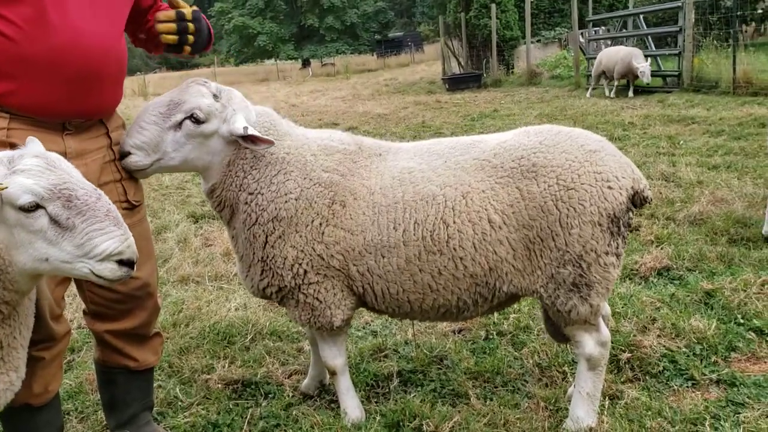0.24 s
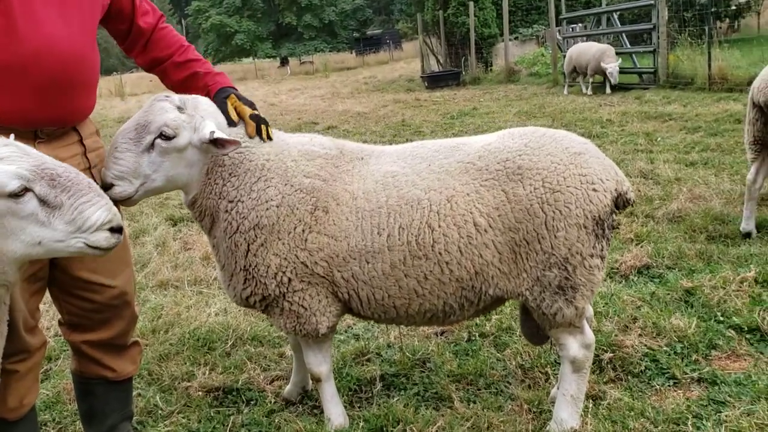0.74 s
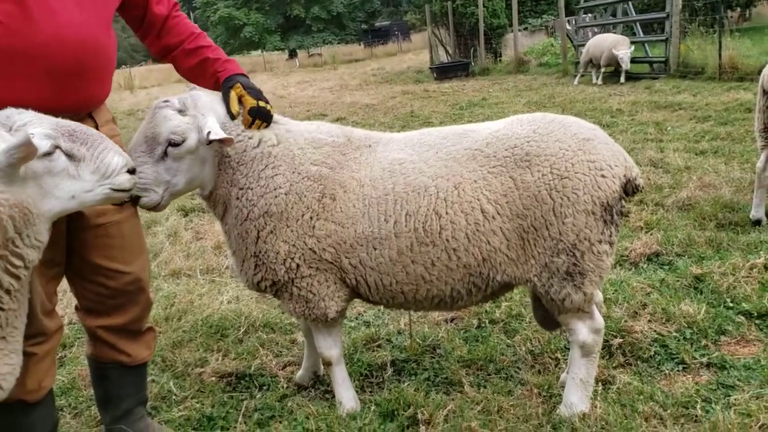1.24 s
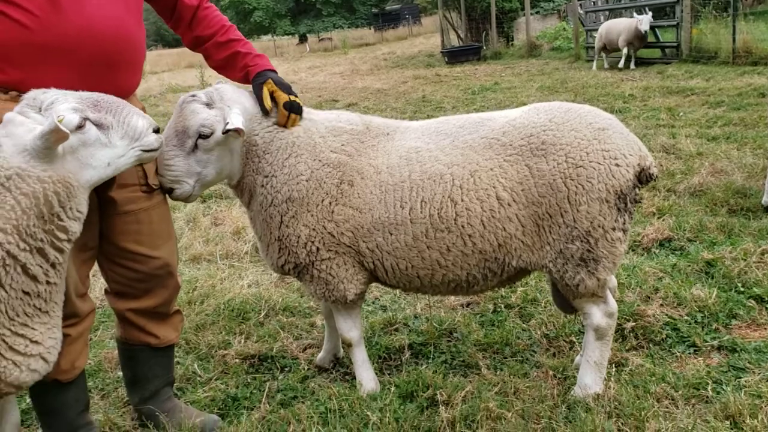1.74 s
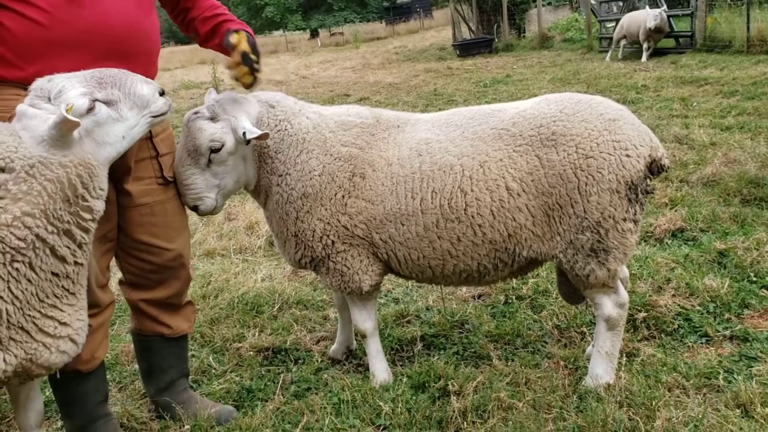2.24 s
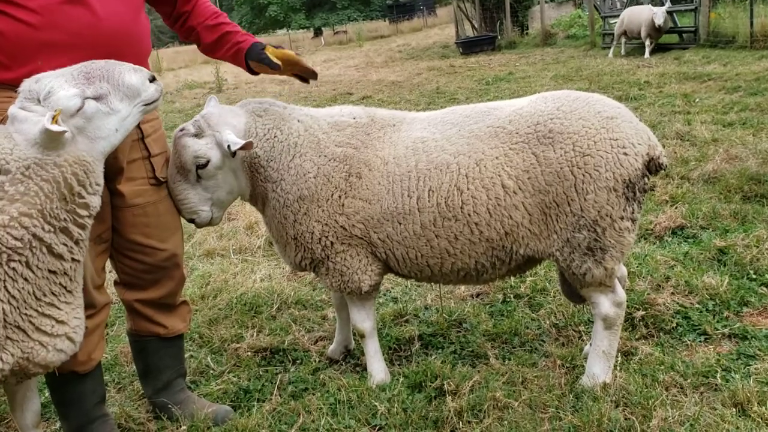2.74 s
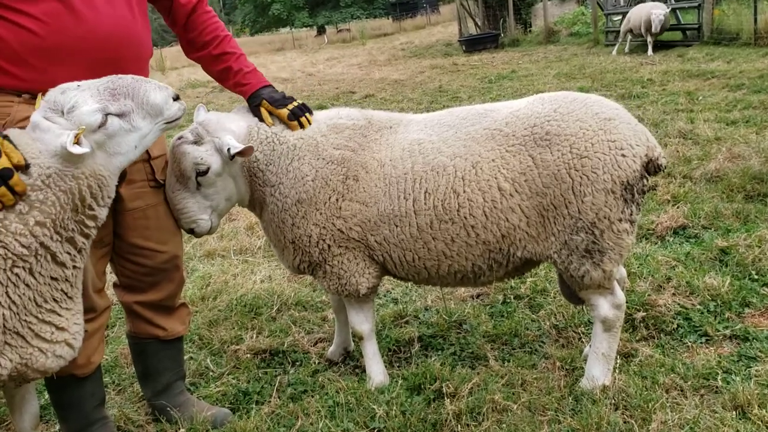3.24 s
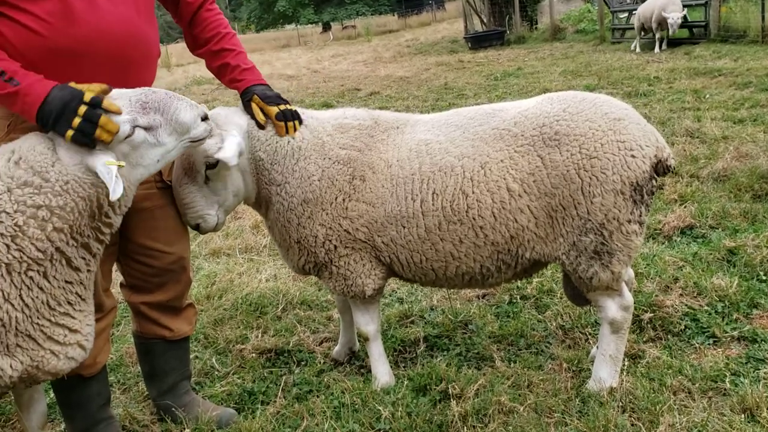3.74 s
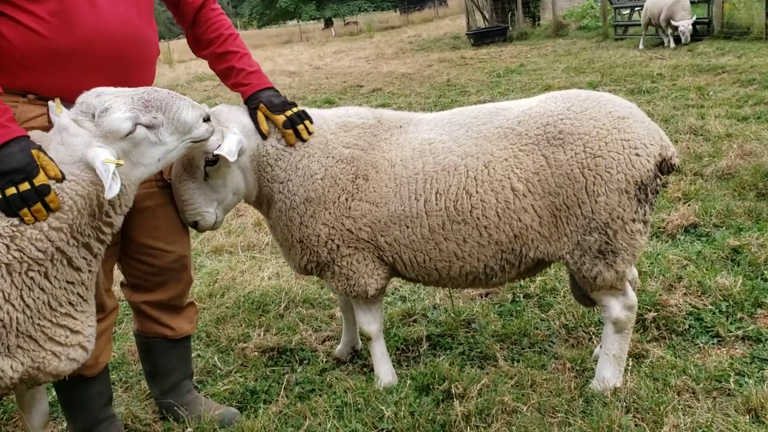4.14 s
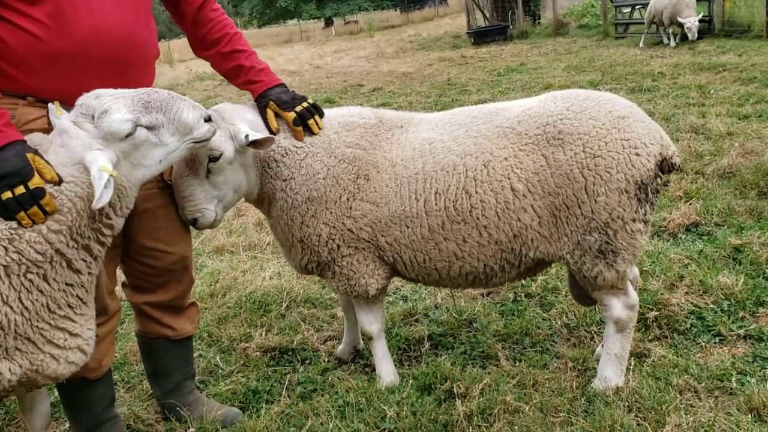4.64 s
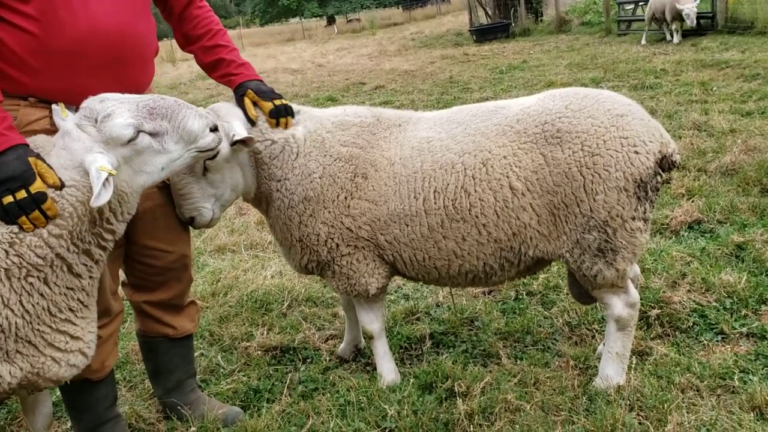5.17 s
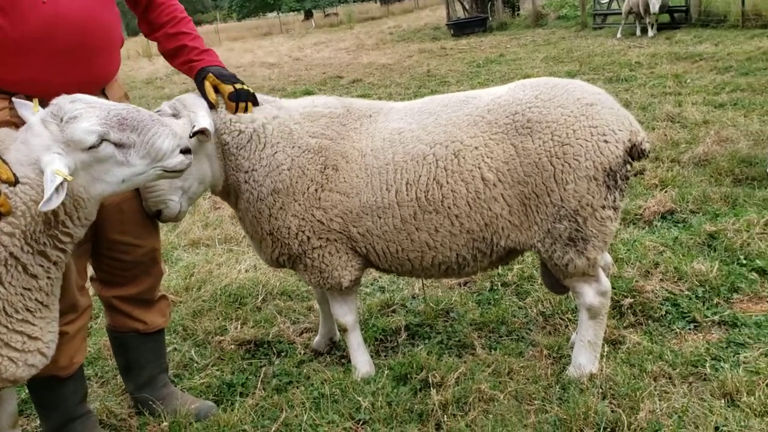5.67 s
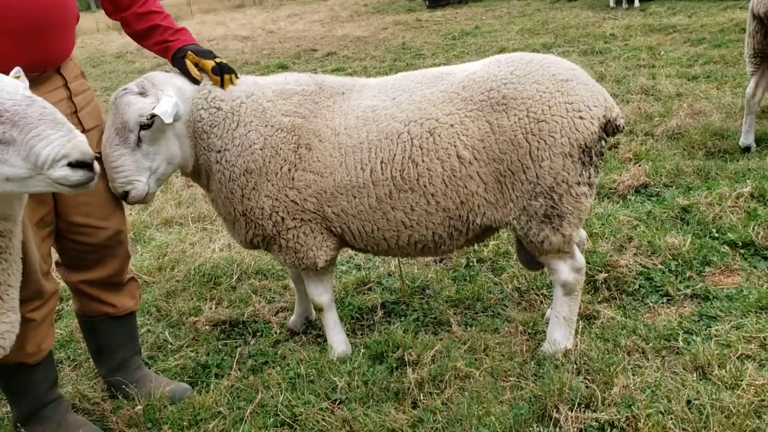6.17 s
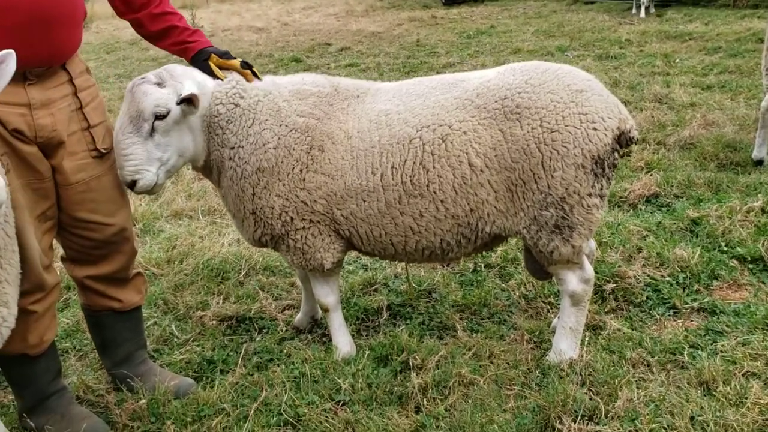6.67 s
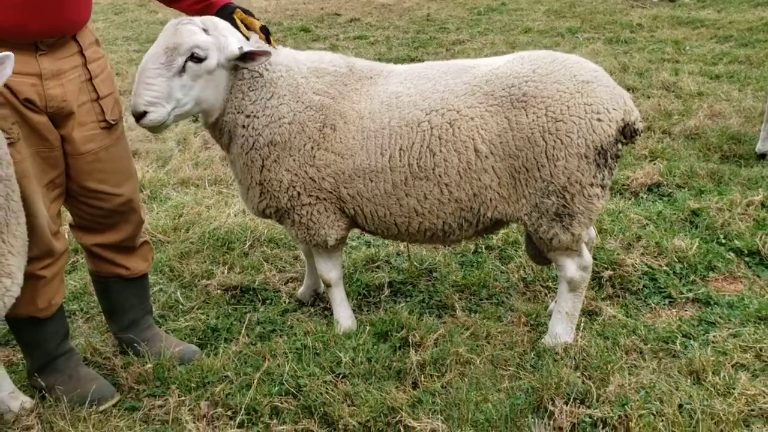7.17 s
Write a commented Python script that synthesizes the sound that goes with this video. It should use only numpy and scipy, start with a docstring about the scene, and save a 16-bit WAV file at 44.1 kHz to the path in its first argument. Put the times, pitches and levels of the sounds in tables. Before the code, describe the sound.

A quiet grassy pasture with faint distant traffic rumble and barely audible machine hum, heard on a stereo phone. A loose sheet-metal hurdle a few metres away, slightly to the left, is knocked by sheep. A loud clattering clank comes at 0.15 seconds, with weaker taps to 0.8. Another cluster rattles from 1.3 to 1.5, with a soft hiss swell. After a lull, several clanks fall between 2.3 and 2.55, then one at 3.0 with dull hoof thuds. Lighter ticks follow, with knocks near 3.9 and 4.7, and a thud at 4.95. A hard, rattling double clank hits at 5.5 to 5.6 with a thud, trailing to 5.9. Small taps continue around 6.5. Bright hiss surges at 6.8, a heavy low thud with a dry knock lands at 7.0, and the strongest clank strikes at 7.4. Each ring is short, noisy and tonal, with a brief scattered outdoor echo.

```python
"""A pasture where sheep jostle and keep knocking a loose sheet-metal hurdle a few metres off.
The hurdle clanks: each blow is a crack, a ring of shaped noise and a set of fading tones, with a short echo
from fences and sheds. Filtered noise makes a soft low murmur and a crisper rattle that swell around the louder
blows, the far traffic rumble and a bright hiss, strongest near the end; hooves thud as damped tones, and faint
machine tones hum. A phone with two microphone ports listens."""
import sys
import numpy as np
from scipy import signal
from scipy.fft import rfft, irfft, next_fast_len
from scipy.io import wavfile
from scipy.ndimage import uniform_filter1d

SR = 44100
rng = np.random.default_rng(int(sys.argv[2]) if len(sys.argv) > 2 else 0)


def store_wav(level_fs):
    """Save 16-bit WAV to argv[1]."""
    pcm = np.round(np.clip(np.atleast_2d(level_fs), -1, 1) * 32767)
    wavfile.write(sys.argv[1], SR, pcm.T.astype(np.int16))


N = 326781
FAST = next_fast_len(N)  # samples, a length that transforms quickly
TOP_HZ = 15850  # top of the noise and of the recorded sound

# edges of the parts, low to high, that the hurdle's ring is split into: f/Hz
PART_EDGES = [300, 2000, 3200, 4500, 6500, 8500, 16500]


def undb(db):
    """Turn decibels into a plain gain."""
    return 10 ** (np.asarray(db) / 20)


def pan(db):
    """Gains of the left and right ports; db is left minus right."""
    return undb(np.array([[1], [-1]]) * db / 2)


def fade(t, t60):
    """Exponential decay that falls by 60 dB in t60 seconds."""
    return np.exp(-np.log(1000) * t / t60)


def over_hz(table, column=1, size=N):
    """A table column read at every frequency of a spectrum, joined by straight lines over log frequency."""
    rows = np.array(table, float)
    hz = np.maximum(np.fft.rfftfreq(size, 1 / SR), 1)
    return np.interp(np.log(hz), np.log(rows[:, 0]), rows[:, column])


def pair(tone, column, size=N):
    """Two-port noise spectrum of a given colour, rms 1; the ports share a part of it."""
    # how alike the two ports hear a sound: f/Hz, near source/0-1, spread source/0-1
    likeness = [(30.2, .9, 0.92), (103, 0.5, .92), (500, 1, 0.73), (970, 1, 0.43), (1880, 1, 0.25),
                (3280, 0.39, 0.43), (4250, 0.16, 0), (6450, 0, 0.07), (15600, 0, 0)]
    alike = np.clip(over_hz(likeness, column, size), 0, 1)
    mid, side = rfft(rng.standard_normal((2, size)))
    gain = undb(over_hz(tone, size=size)) * (np.fft.rfftfreq(size, 1 / SR) < TOP_HZ)
    both = np.sqrt(1 + alike) * mid + np.sqrt(1 - alike) * side * np.array([[1], [-1]])
    return both * gain / np.sqrt(2 * np.mean(gain ** 2))


def walk(rate):
    """Random levels held for 1 / rate seconds and smoothed twice; spread near 1."""
    hold = int(SR / rate)
    steps = np.repeat(rng.standard_normal(N // hold + 1), hold)
    return 0.74 * uniform_filter1d(uniform_filter1d(steps, hold), hold)[:N]


def octaves(spectrum, flicker_db, rate):
    """Turn a spectrum into sound in overlapping octaves, each flickering on its own."""
    place = np.log2(np.maximum(np.fft.rfftfreq(FAST, 1 / SR), 20) / 20)  # octaves above 20 Hz
    total = 0
    for k in range(4, 11):
        share = np.clip(1 - abs(place - k), 0, 1)
        part = irfft(spectrum * share, FAST)[:, :N]
        total = total + part * undb(flicker_db * walk(rate))
    return total


def distance():
    """Far traffic is low noise whose level drifts slightly; far machinery is a few weak wavering tones."""
    # colour of the traffic: f/Hz, level per Hz/dB
    rumble_tone = [(13, -33), (22, -28), (41, -16), (71, -2.5), (90, -3.5), (125, -10), (151, -13.5),
                   (200, -20.5), (226, -16.5), (248, -25.5), (277, -26), (650, -40), (900, -34),
                   (1170, -73), (1980, -120)]
    # tones of the machinery: f/Hz, middle level/dB
    machine_tones = [(147, -76), (181, -78.5), (226, -91)]
    t = np.arange(N) / SR
    hum = 0
    for hz, db in machine_tones:
        level = np.sqrt(2) * undb(db + 2 * walk(1.8))
        hum = hum + level * np.sin(2 * np.pi * hz * t)
    rumble = irfft(pair(rumble_tone, column=2, size=FAST), FAST)[:, :N]
    return hum + rumble * undb(-59.5 + 0.5 * walk(3.975))


def hiss():
    """Bell-shaped swells of bright noise over a faint steady one."""
    # swells: peak t/s, level/dB, rise/s, fall/s
    swells = [(0.0, -72.5, .1, .2), (0.45, -73, .1, 0.092), (1.15, -76, .25, .1),
              (1.42, -63.5, 0.12, 0.092), (1.9, -75.5, 0.072, .2), (3.14, -65.5, 0.061, 0.052),
              (3.82, -70.5, 0.13, 0.14), (4.3, -77.5, 0.17, .2), (4.93, -66.5, .06, 0.046),
              (5.32, -74, 0.052, 0.28), (5.81, -69, .08, 0.071), (6.38, -65, 0.082, 0.12),
              (6.8, -49, .17, 0.11), (7.0, -53.5, 0.12, 0.086), (7.4, -56, 0.12, .1)]
    # colour: f/Hz, level per Hz/dB
    hiss_tone = [(500, -7), (1000, -7.5), (2500, -7.5), (4500, -4.5), (8000, 2.5), (10000, -1), (12000, 5),
                 (16000, 4)]
    floor_db, pan_db = -81, -2
    t = np.arange(N) / SR
    power = undb(2 * floor_db)
    for s, db, rise, fall in swells:
        width = np.where(t < s, rise, fall)
        power = power + undb(2 * db) * np.exp(-((t - s) / width) ** 2)
    sound = octaves(pair(hiss_tone, column=2, size=FAST), flicker_db=0.3, rate=31)
    return sound * np.sqrt(power) * pan(pan_db)


def murmur_and_rattle():
    """Flickering noise split into a soft low murmur and a crisper rattle, swelling around the louder blows."""
    # how loud the two parts are: t/s, murmur level/dB, rattle level/dB
    part_levels = [(0.0, -64, -64), (0.18, -70, -66.5), (0.33, -72, -60.5), (0.56, -72, -69),
                   (0.97, -86, -76), (1.23, -86.5, -79), (1.44, -72, -67), (1.95, -69, -67.5),
                   (2.16, -73, -73), (2.39, -84, -89), (2.51, -61, -63), (2.82, -79.5, -74.5),
                   (3.27, -71, -71.5), (3.68, -80.5, -76), (3.93, -73, -68), (4.63, -82.5, -76.5),
                   (4.82, -70, -69), (4.96, -75.5, -69.5), (5.23, -85, -81.5), (5.47, -73, -78),
                   (5.6, -65, -50), (5.7, -57, -56), (5.86, -73, -72.5), (6.09, -74, -74.5),
                   (6.36, -75, -75.5), (6.73, -69.5, -67), (7.16, -63.5, -67.5), (7.39, -62.5, -61.5)]
    # colour: f/Hz, level per Hz/dB
    noise_tone = [(500, -7.5), (800, -5), (1150, 7), (1500, 1.5), (2100, -7), (3200, -3), (5000, -6),
                  (7500, -6), (9500, -17), (16000, -17)]
    split_hz = 2170
    tone = pair(noise_tone, column=2, size=FAST)
    hz = np.maximum(np.fft.rfftfreq(FAST, 1 / SR), 1)
    crisp = 1 / (1 + (split_hz / hz) ** 6)
    s, *levels_db = np.transpose(part_levels)
    total = 0
    for share, db in zip((1 - crisp, crisp), levels_db):
        part = octaves(tone * share, flicker_db=4.0, rate=16)
        total = total + part / part.std() * undb(np.interp(np.arange(N) / SR, s, db))
    return total


def thuds():
    """Hooves and bodies on turf: a dull damped swing of the ground, pushed softly, with a dry knock on top."""
    # thuds: t/s, level/dB, pitch f/Hz, time to fall 60 dB/s, knock level against the swing/dB
    thud_list = [(0.496, -65, 195, 0.042, -12), (1.095, -50, 335, 0.033, -10),
                 (3.059, -58.5, 323, 0.086, -6), (3.151, -61, 313, 0.095, -12),
                 (4.947, -49, 280, 0.065, -12), (5.5, -43, 342, 0.041, -11), (5.903, -47, 266, 0.034, -12),
                 (6.978, -39.5, 356, 0.026, 8), (6.983, -35, 110, 0.055, -11),
                 (6.993, -45.5, 273, 0.027, 6)]
    size = SR // 5
    t = np.arange(size) / SR
    knock_filter = signal.butter(2, [400, 2200], "band", fs=SR, output="sos")
    out = np.zeros(N + size)
    for s, level_db, hz, t60, knock_db in thud_list:
        soft_start = 1 - np.exp(-t / 0.0039)
        swing = np.sin(2 * np.pi * hz * t) * fade(t, t60) * soft_start
        knock = signal.sosfilt(knock_filter, rng.standard_normal(size)) * np.exp(-t / 0.0022)
        at = int(s * SR)
        out[at:at + size] += undb(level_db) * (swing + undb(knock_db) * knock)
    return out[:N]


def yard(struck):
    """Scattered echoes from fences and sheds: a fading noise tail that builds up over the first moments."""
    # colour of the echo: f/Hz, level per Hz/dB
    echo_tone = [(500, -14), (1100, 8.5), (1600, 2.5), (3000, 5), (3700, -3), (5000, 9), (7000, -11),
                 (9000, -3.5), (16000, -3)]
    echo_db, echo_t60_s, build_up_s = -16, 0.94, 0.0022
    size = SR
    t = np.arange(size) / SR
    noise = irfft(pair(echo_tone, column=2, size=size), size)
    tail = noise * fade(t, echo_t60_s) * (1 - np.exp(-t / build_up_s))
    tail = tail / np.sqrt(np.sum(tail ** 2) / 2)
    # the left port's sound feeds both echoes
    return undb(echo_db) * signal.fftconvolve(struck[:1], tail, axes=1)[:, :N]


def sheet_ring(t, part_db, t60, crack, treble_fade=0.96, chatter_db=2.0, spot_db=4.0):
    """The crowd of sheet modes too close to tell apart: noise in parts, each cracking and then ringing."""
    # colour of the crowd: f/Hz, level per Hz/dB
    sheet_tone = [(300, -25), (800, -17.5), (1150, -1.5), (1600, -1), (1900, -6), (2600, -10.5),
                  (3200, -2.5), (3730, 7), (4150, -5.5), (5200, -5.5), (5800, 3.5), (6300, -6), (7500, -5),
                  (9800, -17.5), (12300, -8.5), (16500, -24)]
    size = len(t)
    hz = np.fft.rfftfreq(size, 1 / SR)
    # loose joints chatter, so each part of the ring comes in lumps of a few milliseconds
    steps = np.repeat(rng.standard_normal((len(part_db), size // 128)), 128, axis=1)
    lumps = uniform_filter1d(steps, size=96)
    # each striking spot favours other groups of modes
    spot_steps = np.repeat(rng.standard_normal(len(hz) // 64 + 1), 64)
    spot = uniform_filter1d(spot_steps, size=48)[:len(hz)]
    sheet = pair(sheet_tone, column=1, size=size) * undb(spot_db * spot)
    total = 0
    for k, db in enumerate(part_db):
        part = irfft(sheet * (hz > PART_EDGES[k]) * (hz <= PART_EDGES[k + 1]), size)
        ring = fade(t, t60 * treble_fade ** k)  # the treble dies sooner
        total = total + undb(db) * part / part.std() * (ring * undb(chatter_db * lumps[k]) + crack)
    return total


def bar_ring(t, part_db, bars_db=-12, scatter_db=3):
    """The clear modes: fading tones whose levels and pitches shift a little, each starting at a random phase."""
    # clear modes: f/Hz, level/dB, time to fall 60 dB/s
    bar_modes = [(371, -18.5, 0.26), (637.6, -10.5, 0.16), (774, -11.5, 0.48), (832, -4.5, 0.34),
                 (1096, 2, 0.37), (1155, -13.5, 0.31), (1324, 2, 0.34), (1440, 3, 0.25), (1556, 6.5, 0.2),
                 (1770, -23, 0.11), (2040, -33, .12), (2189, -0.5, 0.095), (2940, -20, .08),
                 (3230, 7, 0.12), (3460, 10, 0.077), (4030, -15, .1), (5400, -24, .08), (5500, -4, 0.076),
                 (7700, 3, .04), (12400, -8, .04)]
    bar_hz, bar_db, bar_t60 = np.transpose(bar_modes)
    bar_part = np.clip(np.searchsorted(PART_EDGES, bar_hz) - 1, 0, len(PART_EDGES) - 2)
    level_luck, pitch_luck, phase_luck = rng.standard_normal((3, len(bar_hz)))
    gain = undb(bars_db + bar_db + np.array(part_db)[bar_part] + scatter_db * level_luck)
    pitch = bar_hz * (1 + 0.01 * pitch_luck)
    tones = np.sin(2 * np.pi * pitch[:, None] * t + 3 * phase_luck[:, None])
    return gain @ (fade(t, bar_t60[:, None]) * tones)


def hurdle():
    """Each blow cracks and rings the dense and the clear modes in its own mix; returns both layers."""
    # blows: t/s, ring level/dB, brightness per part/dB, extra for the lowest part/dB,
    # time for the lowest part of the dense ring to fall 60 dB/s, crack level against the ring/dB, rise/ms
    blow_list = [(0.1409, -30.5, 0.5, -2, 0.2, -20, 5.2), (0.1503, -35, 1, 3, 0.28, -20, .6),
                 (0.1723, -25, -2.5, -5.5, 0.17, -6, 1.9), (0.2497, -48.5, 1, 10.5, 0.28, -20, 0.5),
                 (0.412, -52.5, -1, -4, 0.43, -23, 3.1), (0.8097, -49.5, -2.5, -9, 0.18, -22, 2.5),
                 (0.8284, -63.5, -3.5, 4, 0.41, -10, 0.48), (1.1345, -65, 0.5, -15, 0.24, -7, 2.2),
                 (1.1859, -60, -1, -4, 0.65, -18, 5.3), (1.265, -60, 5, 6, 0.25, -18, 10),
                 (1.2862, -52.5, 1.5, 4.5, 0.28, -18, 1), (1.3077, -49.5, -2.5, -9, 0.36, -18, 3.1),
                 (1.3368, -34.5, .5, -3, 0.2, -20, 3.1), (1.3793, -29.5, -.5, -2, 0.23, -18, 8.2),
                 (1.4206, -32, -1, -3.5, 0.12, -13, 3.8), (1.4755, -42, -1.5, -2.5, 0.2, -12, 1.7),
                 (1.5238, -58, 4, -5, 0.19, -28, 0.82), (1.6586, -70, -5, 5.5, .14, 17.5, 0.52),
                 (1.794, -60, -0.5, -1, 0.8, -18, 3.1), (2.3424, -32, 0, -0.5, 0.29, -14, 0.76),
                 (2.412, -37, -.5, 3.5, 0.32, -18, 3.6), (2.4404, -35.5, -1.5, -1, 0.15, 1, 3),
                 (2.4842, -40, -.5, 2, .5, -16, 1.5), (2.5354, -41, -0.5, 3, 0.16, -6.5, 0.68),
                 (2.9819, -36, -0.5, 1, 0.23, -7, 1.3), (3.0952, -56.5, 1, 8.5, .16, -8, .9),
                 (3.1248, -50.5, -1, -3, 0.23, -6, 1.6), (3.2275, -58, -2, -18, 0.21, -13, 0.71),
                 (3.3532, -56, 1.5, 2.5, 0.41, -19, 4), (3.4725, -59, -1.5, 1, 0.48, -5, 1),
                 (3.8487, -65, 0.5, 9.5, 0.57, -9, 1.2), (3.9124, -44.5, 0, -0.5, 0.2, 5.5, 0.91),
                 (4.5492, -63, 2, 3, 0.42, -18, 3.5), (4.72, -37.5, 0.5, -3, 0.22, -17, 1.3),
                 (5.118, -65.5, 1.5, -2, 0.23, -18, 4.2), (5.2141, -64, -0.5, -1.5, 0.33, -18, 3.1),
                 (5.244, -61, 2, 5, 0.24, -8, 5.2), (5.42, -50.5, -0.5, 7, 0.38, -23, 1.2),
                 (5.502, -47, 0.5, 3.5, 0.32, -18, 3), (5.526, -22.5, -.5, -9, .14, -12, 2.5),
                 (5.5587, -29, -1, -1.5, 0.21, -19, 0.72), (5.5837, -24, -1.5, -5.5, 0.14, -8, 3.2),
                 (5.6216, -53, -5, 3, .14, 7, 0.29), (5.6788, -45, -2.5, -1.5, 0.24, -10, 2.8),
                 (5.7857, -44.5, -1, 0.5, 0.23, 8.5, 2.3), (5.831, -50, -3, -8, 0.25, 0, 0.61),
                 (6.0604, -68.5, 1, 9.5, 0.29, -18, 1.05), (6.2891, -62.5, 3, -1, 0.22, -18, 0.79),
                 (6.4233, -66, 1.5, 8, .6, -18, 4.9), (6.4705, -56, 0.5, 0, .24, -18, 3.9),
                 (6.506, -44, 0.5, -2, 0.28, -12, 9.6), (7.0999, -63, 0, -0.5, .3, -18, .4),
                 (7.153, -60, 4.5, -7, .08, -16, 1.4), (7.3224, -55, 2.5, 5, 0.24, -20, 1.2),
                 (7.4023, -19, -2.5, -10, .22, -20, 0.74)]
    # level of each part, low to high, in a blow of brightness 0: level/dB
    plain_db = [-8, -9.5, -5, -9, -14, -10.5]
    crack_s, pan_db = 0.00079, 3.5
    size = 12288
    t = np.arange(size) / SR
    part = np.arange(len(plain_db))
    dense, clear = np.zeros((2, 2, N + size))
    for s, ring_db, bright_db, body_db, t60, crack_db, rise_ms in blow_list:
        part_db = np.array(plain_db) + bright_db * (part - 2) + body_db * (part == 0)
        rise = rise_ms / 1000
        crack = undb(crack_db) * np.exp(-abs(t - 0.78 * rise) / crack_s)
        shape = (1 - np.exp(-(t / rise) ** 2)) * undb(ring_db) * pan(pan_db)
        at = int(s * SR)
        dense[:, at:at + size] += sheet_ring(t, part_db, t60, crack) * shape
        clear[:, at:at + size] += bar_ring(t, part_db) * shape
    return dense[:, :N], clear[:, :N]


def scene():
    """Add the background, the murmur, rattle and thuds, and the hurdle with its echo."""
    background = distance() + hiss()
    movement = murmur_and_rattle() + thuds()
    dense, clear = hurdle()
    echo = yard(dense + clear / 2)
    return background + movement + echo + dense + clear


def record(dry):
    """Each port has its own colour, the left one hears a little later, and both ends of the range are cut."""
    # the phone's body shades its ports: f/Hz, left minus right/dB
    port_shade = [(60, 1), (250, -4), (700, 0), (1500, 1), (2500, -5), (4500, -3), (5800, 1), (7400, 7.5),
                  (8800, -4.5), (10700, 2.5), (12300, -7), (13700, -2), (15500, -6)]
    left_lag_s, bass_cut_hz = 0.00013, 19
    size = next_fast_len(N + 4096)
    tilt = undb(over_hz(port_shade, size=size) / 2)
    lag = np.exp(-2j * np.pi * np.fft.rfftfreq(size, 1 / SR) * left_lag_s)
    heard = irfft(rfft(dry, size) * np.array([tilt * lag, 1 / tilt]), size)[:, :N]
    heard = signal.sosfilt(signal.butter(2, bass_cut_hz, "high", fs=SR, output="sos"), heard)
    return signal.sosfilt(signal.ellip(10, .2, 80, TOP_HZ, fs=SR, output="sos"), heard)


dry = scene()
out = record(dry)
store_wav(out)
```